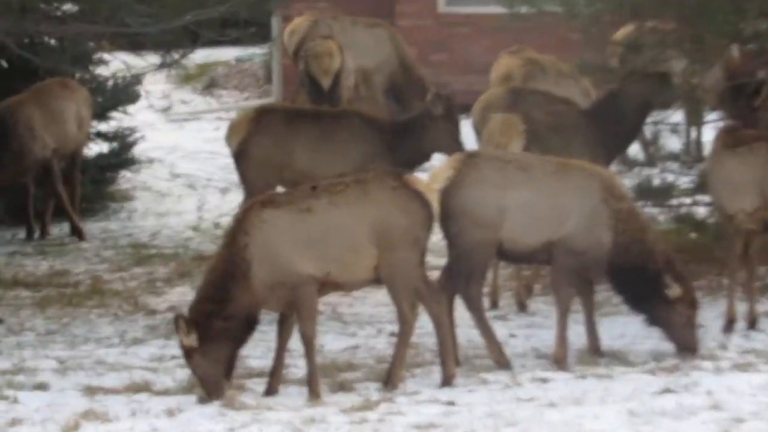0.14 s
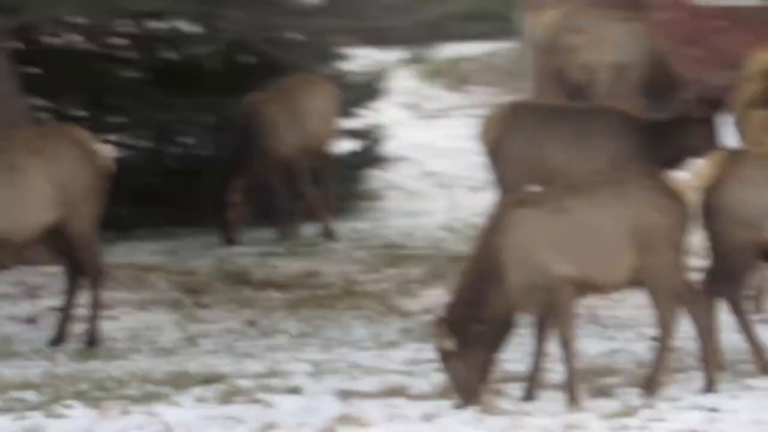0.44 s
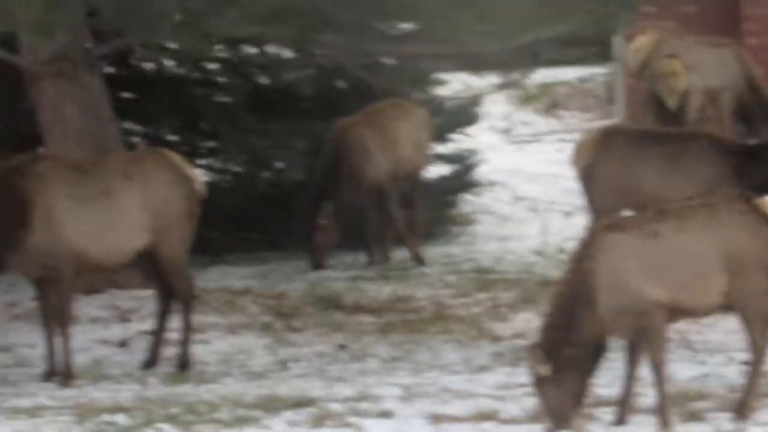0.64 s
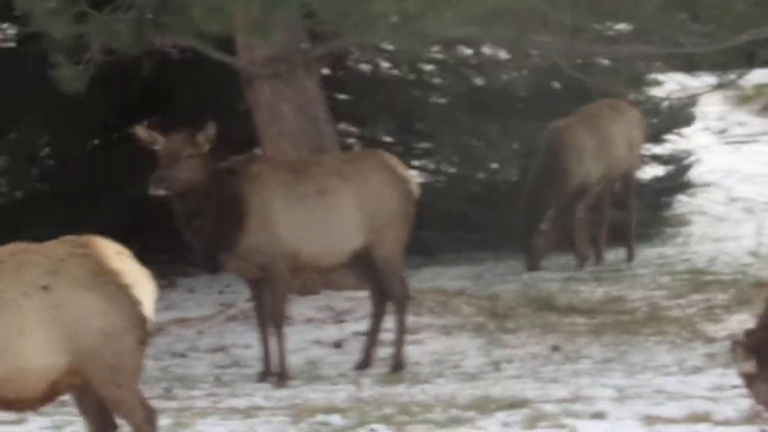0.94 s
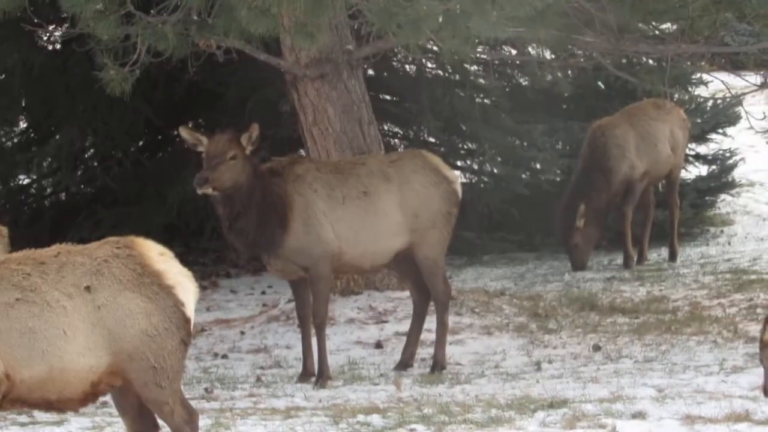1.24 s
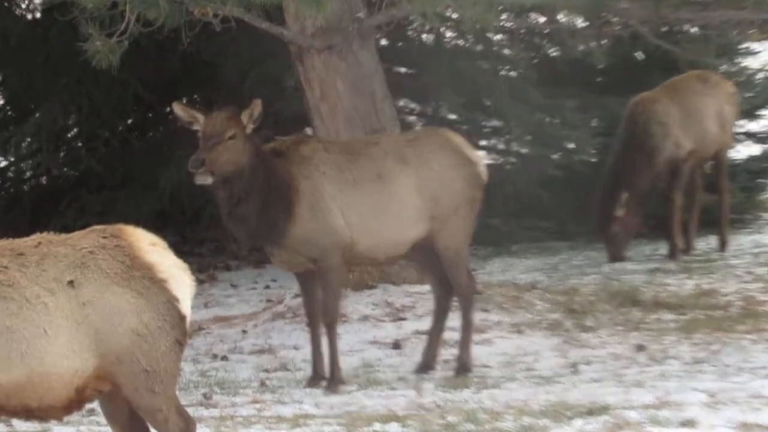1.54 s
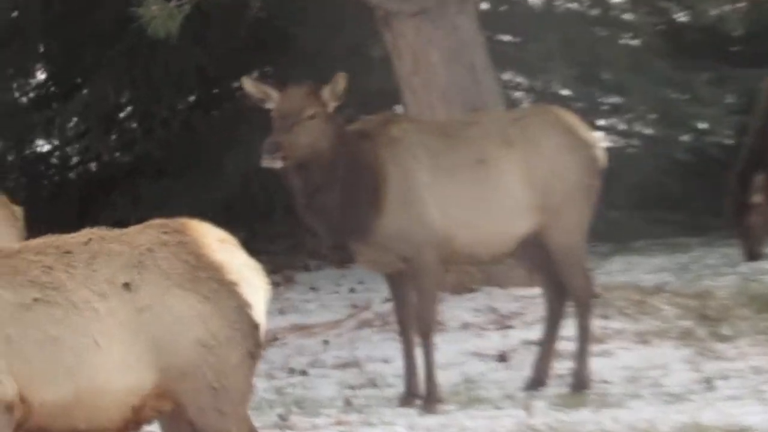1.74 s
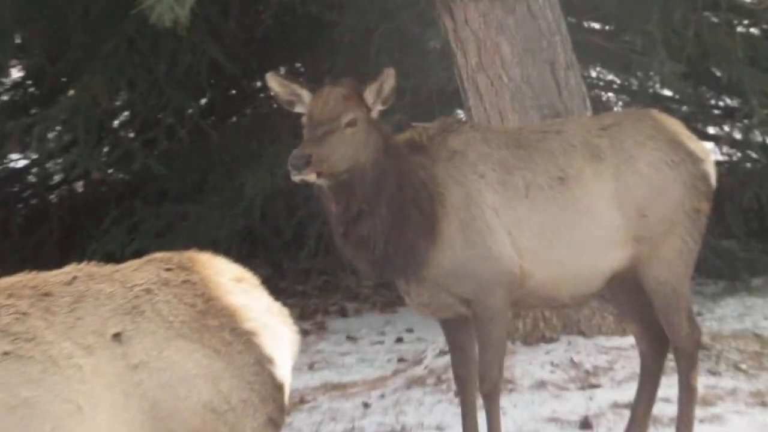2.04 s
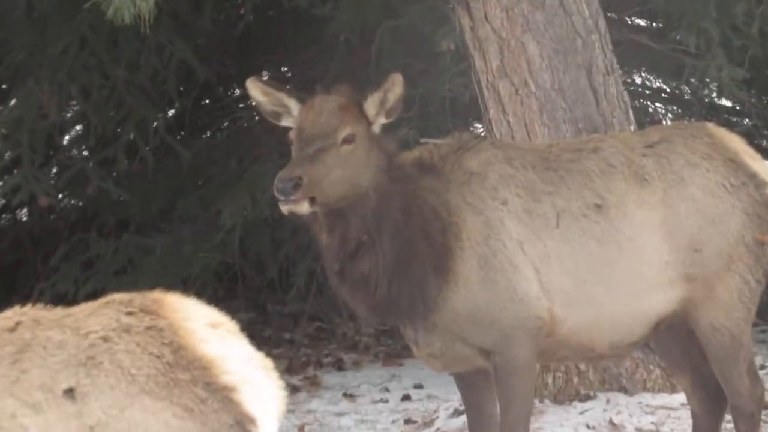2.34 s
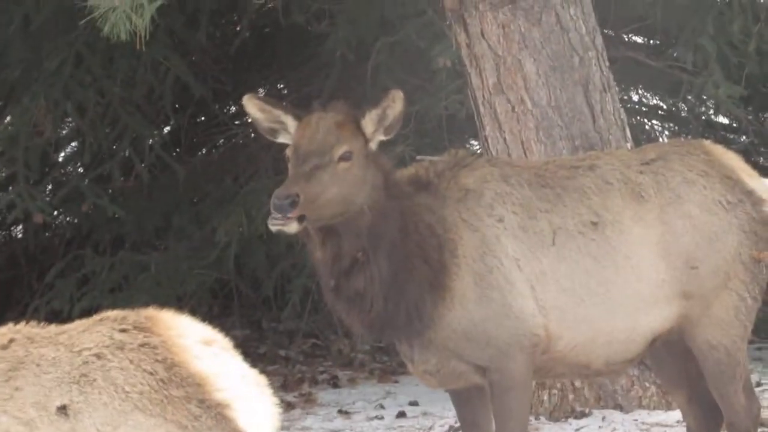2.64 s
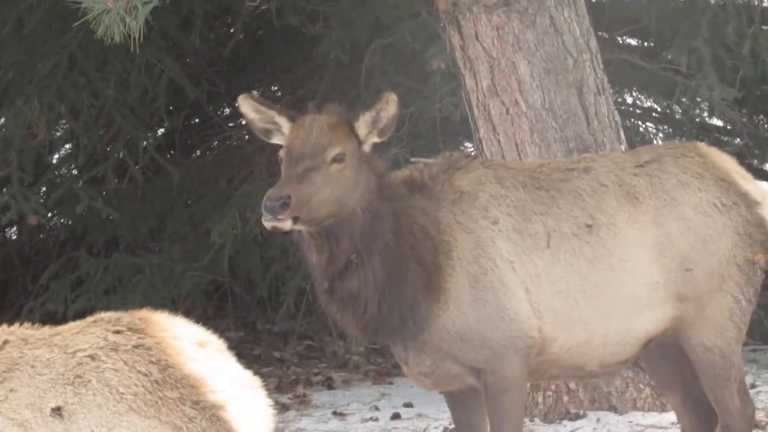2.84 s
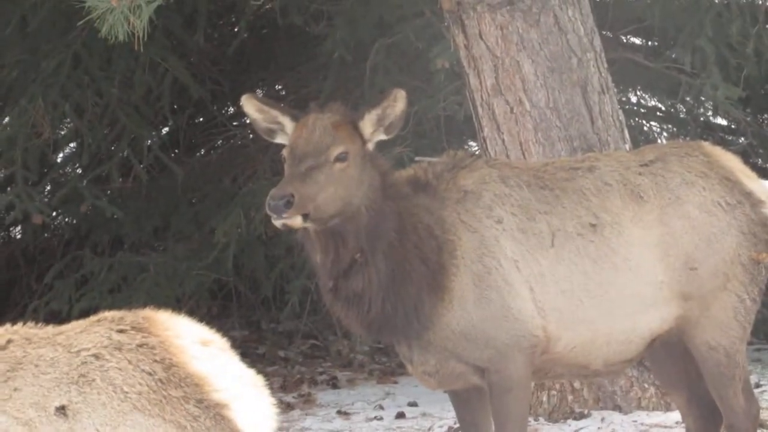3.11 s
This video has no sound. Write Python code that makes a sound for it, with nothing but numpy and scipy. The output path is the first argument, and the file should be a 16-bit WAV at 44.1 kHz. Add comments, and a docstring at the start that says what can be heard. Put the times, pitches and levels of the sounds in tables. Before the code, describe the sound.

An elk gives a thin, high, falling mew right at the start. A second comes at about 1.1 seconds and ends in a rasp near 1.5, where all sound briefly dips. A third, at 2.2 seconds, breaks into a rough falling squeak. An engine idles nearby throughout under a soft outdoor rush. A camera's zoom whirs faintly at the start and from 1.5 to 2.4 seconds, with occasional faint ticks.

```python
"""Elk mew three times on a snowy lawn: thin, high calls that slide down in pitch, the second ending
in a rasp, the third breaking into a rough falling squeak. Each call is a tone with overtones, shaped
by the throat and mouth, with a short echo. An engine idles close by under a soft outdoor rush.
A camera's zoom motor whirs, there are a few faint ticks and a tiny peep, and the whole sound dips
briefly near the end of the second call."""
import sys
import numpy as np
from scipy import signal
from scipy.fft import rfft, irfft
from scipy.io import wavfile
from scipy.ndimage import uniform_filter1d

SR = 44100
rng = np.random.default_rng(int(sys.argv[2]) if len(sys.argv) > 2 else 0)


def to_wav(s):
    """Save 16-bit WAV."""
    ch = np.atleast_2d(s).T  # columns
    pcm = np.round(np.clip(ch, -1, 1) * 32767)  # PCM
    wavfile.write(sys.argv[1], SR, pcm.astype(np.int16))


N = 144207


def elk():
    """Three calls: a plain mew, a mew with a rasp, and a mew that breaks into a squeak."""
    # how each call moves (time [s], pitch [Hz], level [dB], roughness [0-1], mouth resonance [Hz])
    first = [(0, 1138, -41.5, 0.1, 3500), (.025, 1083, -41.5, .16, 4200), (.045, 1028, -43.5, 0.08, 4200),
             (.065, 994, -42.5, .25, 4630), (.09, 954, -46, 0.4, 4200), (.112, 936, -47, .18, 2800),
             (.14, 868, -49.5, 0.23, 2650), (.19, 777, -61, .45, 2400)]
    second = [(1.14, 1272, -65, .5, 2530), (1.18, 1230, -53, .5, 2450), (1.214, 1170, -53, .4, 3400),
              (1.232, 1104, -43.5, .18, 3730), (1.29, 1052, -43, .22, 4100), (1.341, 1015, -43.5, .3, 3650),
              (1.379, 943, -46, .6, 2200), (1.415, 862, -48, 0.31, 2550), (1.45, 788, -61, 0.48, 2400)]
    third = [(2.18, 1340, -69, 0.36, 2700), (2.215, 1455, -53.5, .3, 2900), (2.255, 1495, -52.5, .22, 3700),
             (2.3, 1447, -52, .25, 2900), (2.315, 1284, -62, .4, 2500), (2.33, 1227, -59, .4, 2400),
             (2.34, 1190, -68, .5, 2400)]
    squeak = [(2.33, 1164, -56, 0.24, 4500), (2.355, 1073, -50.5, .28, 3900), (2.38, 965, -53.5, .32, 3000),
              (2.4, 860, -58, .45, 2600), (2.42, 810, -58, .35, 2400), (2.44, 784, -71, .5, 2400)]
    # harmonics (tones at 1, 2, 3... times the pitch) before the throat shapes them (level [dB])
    first_db = [4.5, -18, -16, -18.5, -27]
    second_db = [-13, -12, -13.5, -15.5, -22]
    third_db = [-1.5, -8.5, -10.5, -29]
    squeak_db = [-14, -19, -11, -15]
    return (mew(first, first_db) + mew(second, second_db) + rasp()
            + mew(third, third_db) + mew(squeak, squeak_db))


def mew(curve, harmonics_db):
    """A sliding voice passes through the throat; the mouth boosts harmonics near its resonance."""
    # how the throat colours the voice (frequency [Hz], gain [dB])
    throat = [(700, -9), (1050, -4.5), (1500, -1), (1720, -9), (1950, 2), (2100, -1), (2300, 0),
              (2450, -1.5), (2650, 0), (2980, -7.5), (3300, -2.5), (3500, -10.5), (3850, -12), (4100, -4),
              (4350, -3.5), (4650, -1.5), (5300, -3.5), (6500, -3), (9000, -15)]
    mouth_db, mouth_width_hz, flicker_db = 6, 470, 2.8
    t = clock()
    when, hz, db, rough, mouth_hz = np.array(curve).T
    mouth_hz = np.interp(t, when, mouth_hz)
    rough = np.clip(np.interp(t, when, rough), 0, 1)
    wobble = 1 + .004 * walk(67) + .0247 * rough * walk(316)  # a rough voice shakes more in pitch
    pitch = uniform_filter1d(np.interp(t, when, hz), size=500) * wobble
    phase = 2 * np.pi * np.cumsum(pitch) / SR
    calling = uniform_filter1d(1. * ((t >= when[0]) & (t < when[-1])), size=400)
    loudness = undb(np.interp(t, when, db)) * calling
    voice = 0
    for k, strength_db in enumerate(harmonics_db, 1):
        boost_db = mouth_db * np.exp(-((k * pitch - mouth_hz) / mouth_width_hz) ** 2)
        gain = undb(strength_db + boost_db + flicker_db * walk(21))
        voice = voice + gain * response(k * pitch, throat) * np.sin(k * phase)
    flutter = 1 + 0.83 * rough * walk(510)  # roughness shakes the loudness too
    return np.sqrt(2) * loudness * voice * flutter


def rasp():
    """The voice breaks up into a hoarse rush that swells and dies away."""
    # colour of the hoarse voice (frequency [Hz], level [dB])
    colour = [(800, -14), (1300, -4), (1650, 3.5), (1900, 1.5), (2100, -6), (2300, 4), (2450, 3),
              (2600, 0.5), (2800, -10.5), (3300, -12), (3700, -10), (4200, -13), (5200, -13.5), (7000, -21),
              (12000, -32)]
    start_s, peak_s, fade_s, level_db = 1.343, 1.512, 0.035, -43.5
    t = clock()
    swell = np.clip((t - start_s) / (peak_s - start_s), 0, 1)
    fade = np.exp(-np.maximum(t - peak_s, 0) / fade_s)
    return undb(level_db) * swell * fade * noise(colour) * (1 + 0.22 * walk(180))


def echo(sound):
    """Trees and a house wall scatter back a faint, short tail, different in each ear."""
    delay_s, decay_s, level_db = .012, 0.046, -12
    t = clock()
    tail = np.clip(t / delay_s - 1, 0, 1) * np.exp(-t / decay_s) * rng.standard_normal((2, N))
    tail = tail / np.sqrt(np.sum(tail ** 2, axis=1, keepdims=True))
    return undb(level_db) * signal.fftconvolve(sound[None], tail, axes=1)[:, :N]


def engine():
    """An even idle: the firings make a low note, and a rumble throbs twice per firing."""
    # tones in the exhaust note (multiple of the firing rate, level [dB])
    exhaust = [(1, -21), (2, -3.5), (3, -6), (4, -7), (5, -5), (6, -0.5), (7, -5.5), (8, -6.5), (9, -15),
               (10, -14), (11, -15), (12, -27.5)]
    # colour of the rumble (frequency [Hz], level [dB])
    colour = [(25, -54), (50, -16.5), (75, -10.5), (100, -7.5), (122, 0.5), (150, -2.5), (185, -8),
              (250, -13), (330, -15), (430, -19.5), (550, -22.5), (680, -37), (1000, -64)]
    firing_hz, note_db, rumble_db = 22.9, -36.5, -34
    speed = 1 + 0.00467 * walk(3.45)
    phase = 2 * np.pi * np.cumsum(firing_hz * speed) / SR
    note = 0
    for k, db in exhaust:
        waver_db = 1.5 * min(k / 4, 2) * walk(7.5)  # higher tones waver more
        note = note + undb(db + waver_db) * np.sin(k * phase + rng.uniform(0, 2 * np.pi))
    throb = 1 + 0.13 * np.sin(2 * phase)
    rumble = spread(noise(colour), noise(colour)) * throb
    return undb(note_db) * unit(note) * pan(db=7) + undb(rumble_db) * rumble


def rush():
    """A soft, steady outdoor rush with a few unsteady whines in it and a thin hiss on top."""
    # colours of the rush and of the microphone's hiss (frequency [Hz], level [dB])
    rush_colour = [(200, -10), (520, -4), (690, -17), (800, -3), (920, -1.5), (1060, 2.5), (1150, -4),
                   (1240, 1), (1370, -6.5), (1580, -5.5), (1900, -16.5), (2250, -19), (2500, -20.5),
                   (2750, -24), (3000, -25), (3600, -32), (6000, -52)]
    hiss_colour = [(1500, -6), (2600, -11), (3500, -1), (4300, 3.5), (5200, -0.5), (5900, -0.5), (6500, 3),
                   (7200, 1.5), (8500, 0), (11500, -2.5), (12600, -4.5), (14000, -8), (15000, -10)]
    # narrow whines (pitch [Hz], width [Hz], level [dB])
    tones = [(812.4, 31, -60.5), (1065, 34, -60), (1219, 19, -60), (1492, 35, -65), (1577, 140, -70.5),
             (2450, 29, -72), (3946, 200, -75), (4460, 93, -77.5), (5830, 220, -73.5)]
    rush_db, flutter_db, hiss_db = -46, 0.6, -62.5
    whines = sum(undb(db) * whine(hz, width_hz) for hz, width_hz, db in tones)
    air = undb(rush_db) * noise(rush_colour) * undb(flutter_db * walk(19))
    return air + whines + undb(hiss_db) * noise(hiss_colour)


def zoom_motor():
    """A faint high buzz, pulsed by the motor's steps and a knock on each turn, over a thin hum."""
    # when the motor runs (start [s], end [s], level [dB])
    runs = [(-.05, .25, -65), (1.51, 2.277, -62), (2.283, 2.41, -66)]
    # colour of the buzz (frequency [Hz], level [dB])
    colour = [(1800, -28), (2200, -18), (2520, 6.5), (2800, -3), (3100, -16), (4000, -7), (6000, -14),
              (8100, -12), (8550, 0), (9300, -9), (11200, -8), (11900, 0.5), (12550, 2), (12900, -1.5),
              (13500, -4.5), (14100, -14), (14900, -8)]
    turn_hz, step_hz, hum_db = 33.3, 199.8, -71.5
    knock_s = 1.51  # a knock and a step line up here
    t = clock()
    running = sum(undb(db) * ((t >= start) & (t < end)) for start, end, db in runs)
    running = uniform_filter1d(running, size=400)
    knocks, steps = (np.cos(np.pi * hz * (t - knock_s)) ** 4 for hz in (turn_hz, step_hz))
    pulsing = unit(np.exp(.84 * knocks + 1.4 * steps))
    hum = undb(hum_db) * whine(hz=2484, width_hz=130)
    return running * pulsing * wide(colour, width=1.05) + running / running.max() * hum


def ticks():
    """Handling the camera makes small dry ticks: bursts of noise that die away fast."""
    # each tick (time [s], level [dB])
    taps = [(0.216, -50), (1.379, -53), (3.049, -59)]
    # colour of a tick (frequency [Hz], level [dB])
    colour = [(1500, -8), (3500, 2), (5200, 3), (6000, 1), (6800, 3.5), (9000, -2), (12500, -8),
              (15000, -14)]
    decay_s = 0.0071
    t = clock()
    bursts = sum(undb(db) * (t >= at) * np.exp(-np.abs(t - at) / decay_s) for at, db in taps)
    return bursts * wide(colour, width=0.76)


def peep():
    """One tiny peep: a pure tone that quickly fades in and out."""
    peak_s, fade_s, pitch_hz, level_db = 2.579, 0.0052, 2300, -49
    t = clock()
    return undb(level_db) * np.exp(-((t - peak_s) / fade_s) ** 2) * np.sin(2 * np.pi * pitch_hz * t)


def spread(shared, other):
    """Place two unrelated noises of one colour between the ears, frequency by frequency."""
    # which ear is louder (frequency [Hz], left minus right [dB])
    balance = [(60, 5), (110, 6.5), (200, 6), (370, 3), (690, 1), (1260, -3.5), (2320, -0.5), (4270, 0.5),
               (7850, 1.0), (14400, 0)]
    # how alike the ears sound (frequency [Hz], likeness [0-1])
    likeness = [(60, 0.94), (130, 0.96), (290, 0.72), (630, 0.91), (1380, 0.87), (2500, 1), (4500, 0.81),
                (7000, 0.33), (14400, 0.23)]
    # how far the wave at the left ear is ahead (frequency [Hz], lead [radians])
    left_lead = [(60, 1), (130, -0.34), (430, -0.7), (1030, -1.0), (1550, -.5), (2670, 0.5), (4200, 0.3),
                 (6000, -2), (7600, -0.9), (12000, -3)]
    hz = np.fft.rfftfreq(N, 1 / SR)
    db, alike, lead = (look_up(hz, table) for table in (balance, likeness, left_lead))
    side = np.array([[1], [-1]])
    ears = undb(side * db / 2) * np.exp(side * 1j * lead / 2)
    together = ears * np.sqrt(1 + alike)
    opposed = ears * side * np.sqrt(1 - alike)
    centre_gain = np.hypot(abs(together.mean(0)), abs(opposed.mean(0)))
    return irfft((together * rfft(shared) + opposed * rfft(other)) / centre_gain, N)


def whine(hz, width_hz):
    """A narrow, unsteady tone of strength about 1."""
    phase = 2 * np.pi * hz * clock()
    return walk(width_hz) * np.sin(phase) + walk(width_hz) * np.cos(phase)


def noise(colour):
    """Noise of strength 1; its colour says how loud the low and high frequencies are."""
    gain = response(np.fft.rfftfreq(N, 1 / SR), colour)
    return unit(irfft(rfft(rng.standard_normal(N)) * gain, N))


def wide(colour, width):
    """Stereo noise: one part is the same in both ears, the other is opposite."""
    return noise(colour) + width * noise(colour) * np.array([[1], [-1]])


def walk(rate_hz):
    """Smooth random wandering of strength 1, up to about the given rate."""
    hz = np.fft.rfftfreq(N, 1 / SR)
    return unit(irfft(rfft(rng.standard_normal(N)) * np.exp(-(hz / rate_hz) ** 2) * (hz > 0), N))


def pan(db):
    """Left and right gains that make the left louder by db."""
    gains = undb(np.array([[db], [-db]]) / 2)
    return gains / gains.mean()


def look_up(hz, table):
    """Read a (frequency, value) table at any frequency, gliding between its rows."""
    table_hz, values = np.array(table).T
    return np.interp(np.log(np.maximum(hz, 1)), np.log(table_hz), values)


def response(hz, colour):
    """Gain of a colour table at the given frequencies."""
    return undb(look_up(hz, colour))


def undb(db):
    """Turn decibels into a gain to multiply by."""
    return 10 ** (np.asarray(db) / 20)


def unit(x):
    """Scale to an average strength (rms) of 1."""
    return x / np.sqrt(np.mean(x ** 2))


def clock():
    """Time of each sample in seconds."""
    return np.arange(N) / SR


def scene():
    """The elk, nearly straight ahead, over the engine, the rush and the small noises."""
    calls = elk()
    return (calls * pan(db=2.0) + echo(calls) + engine() + spread(rush(), rush())
            + zoom_motor() + ticks() + peep())


def record(dry):
    """The level dips briefly, and the highest treble is cut."""
    dip_start_s, dip_end_s, dip_db, top_hz = 1.4365, 1.5055, -17, 14950
    t = clock()
    dip = np.where((t > dip_start_s) & (t < dip_end_s), undb(dip_db), 1.)
    treble_cut = signal.ellip(10, .2, 80, top_hz, fs=SR, output="sos")
    return signal.sosfilt(treble_cut, dry * uniform_filter1d(dip, size=40))


dry = scene()
out = record(dry)
to_wav(out)
```